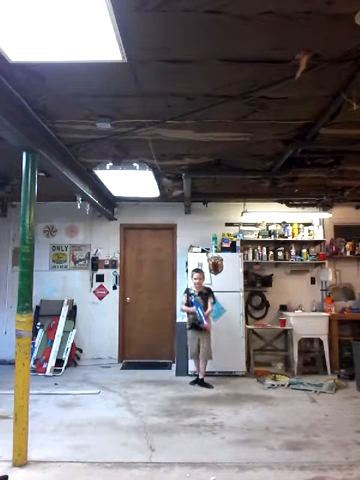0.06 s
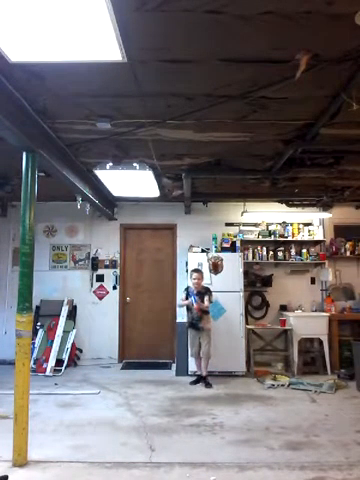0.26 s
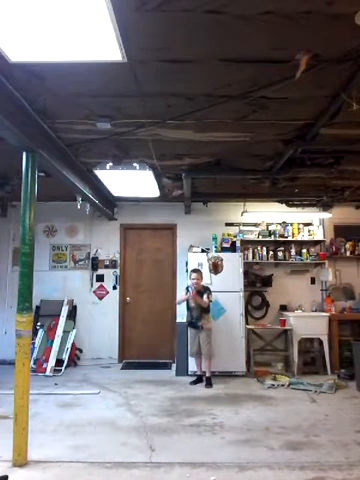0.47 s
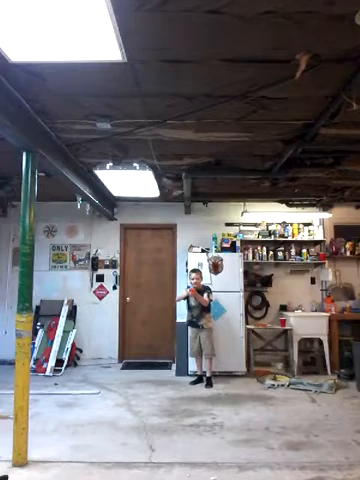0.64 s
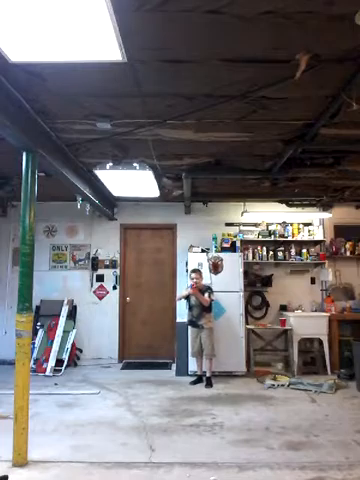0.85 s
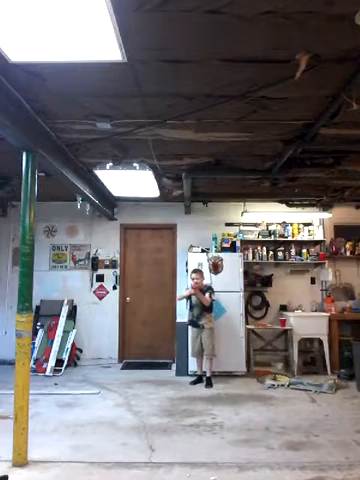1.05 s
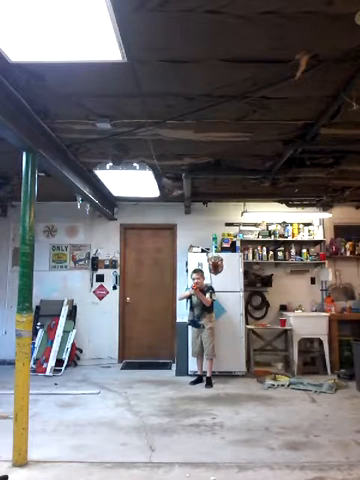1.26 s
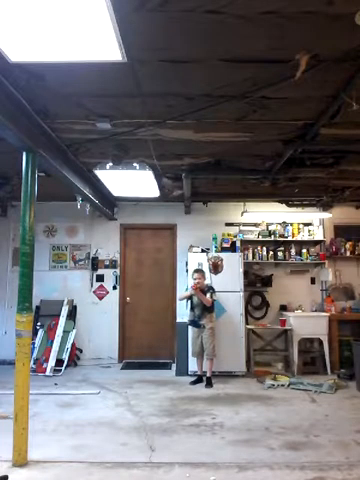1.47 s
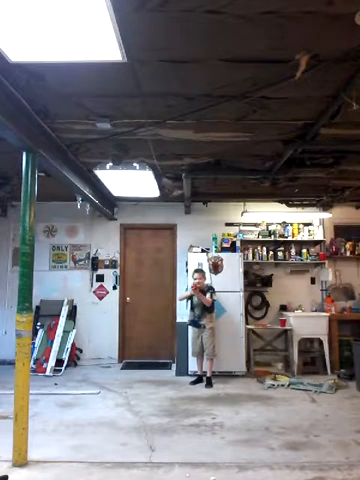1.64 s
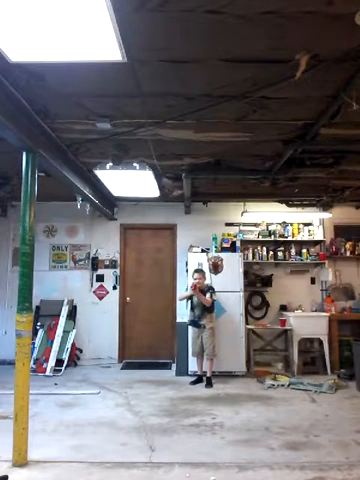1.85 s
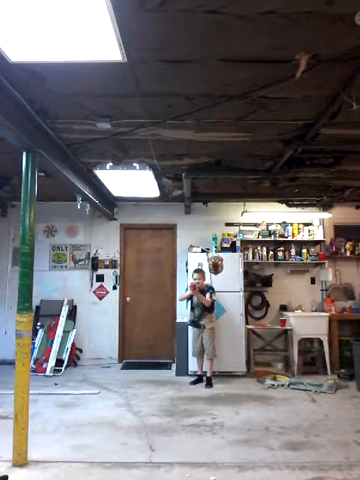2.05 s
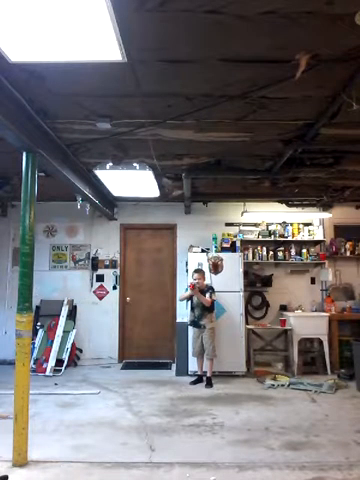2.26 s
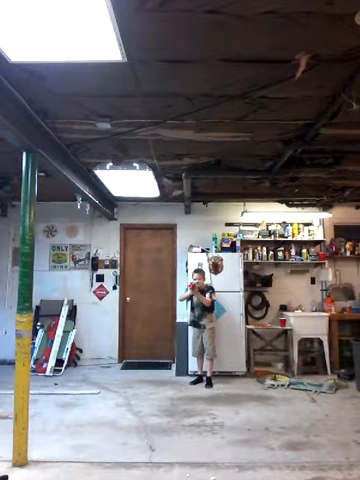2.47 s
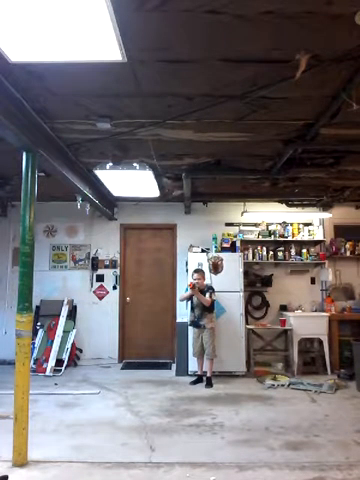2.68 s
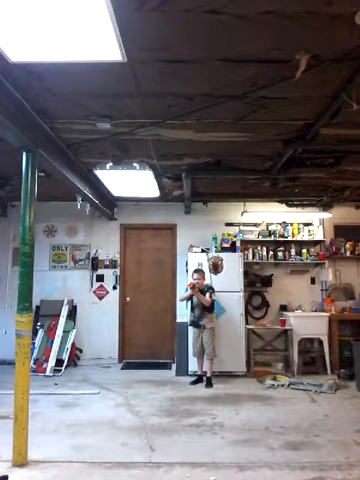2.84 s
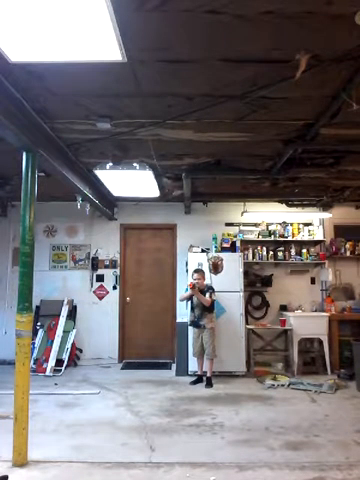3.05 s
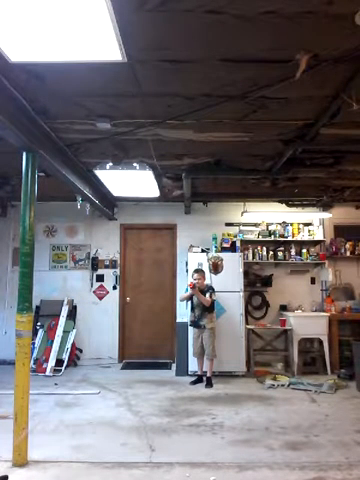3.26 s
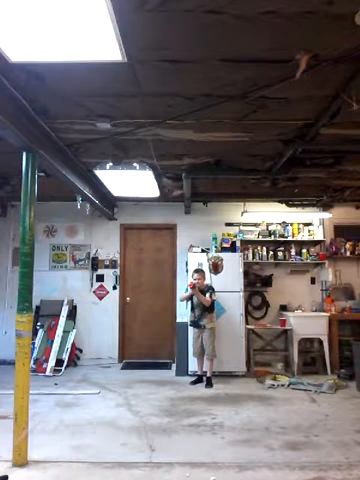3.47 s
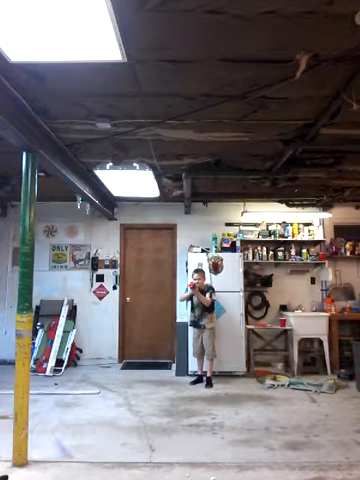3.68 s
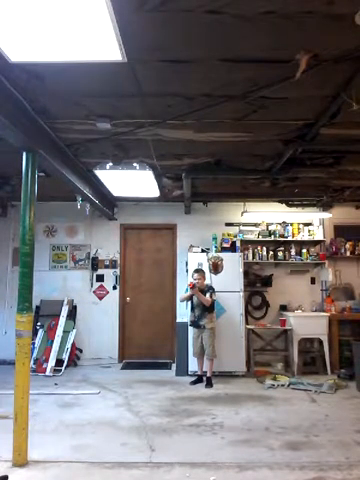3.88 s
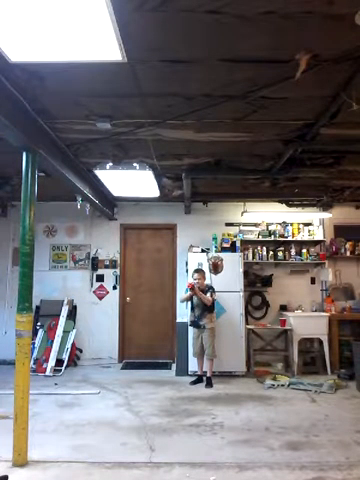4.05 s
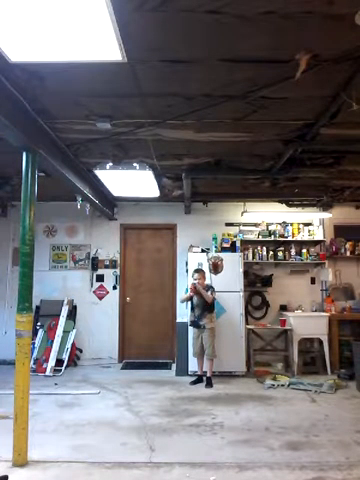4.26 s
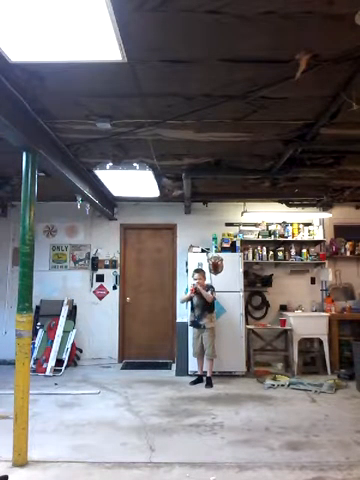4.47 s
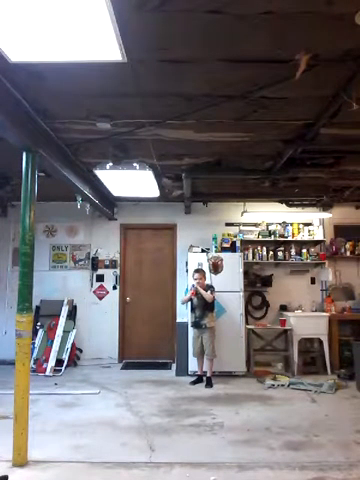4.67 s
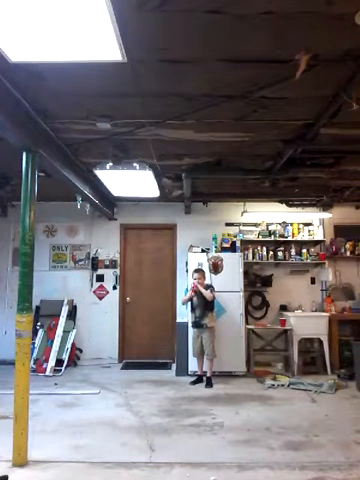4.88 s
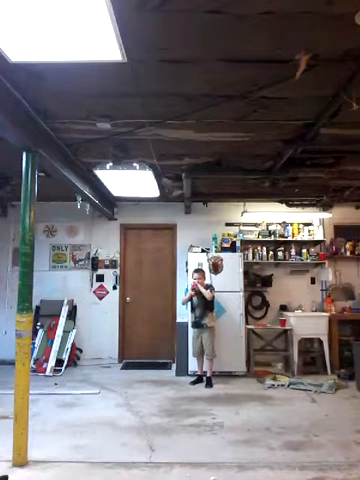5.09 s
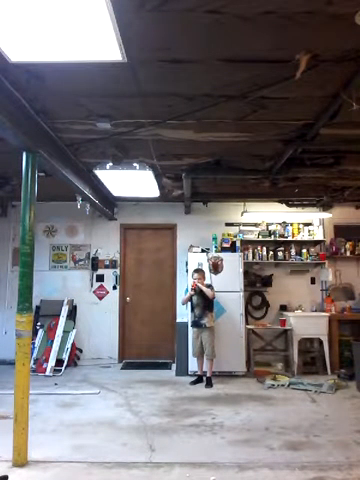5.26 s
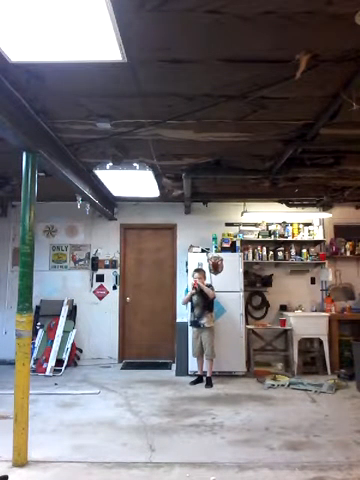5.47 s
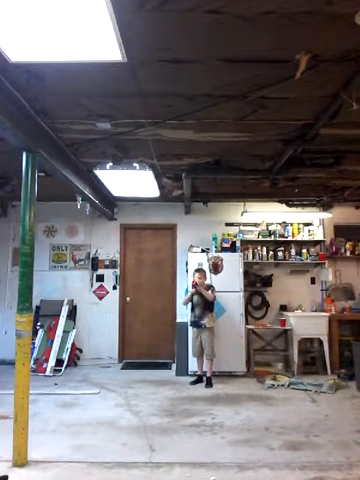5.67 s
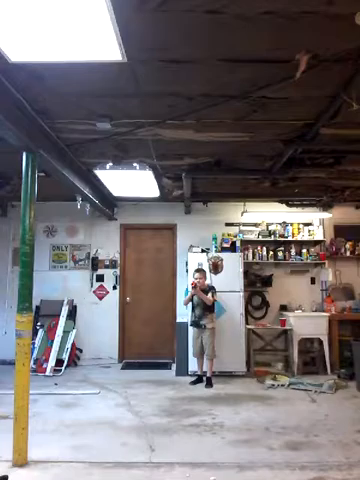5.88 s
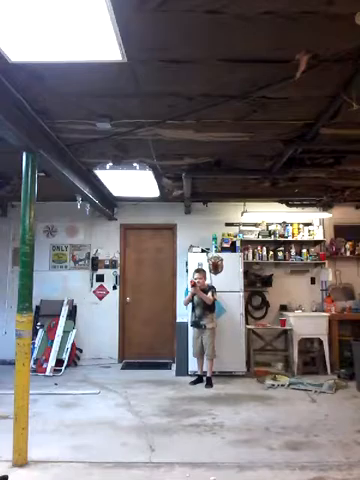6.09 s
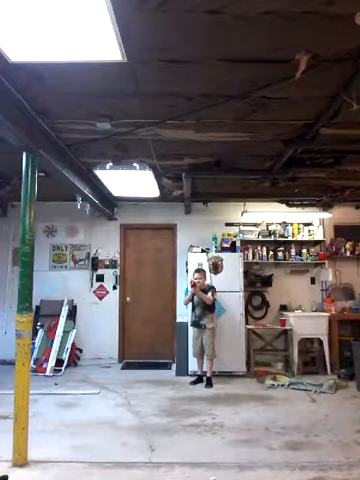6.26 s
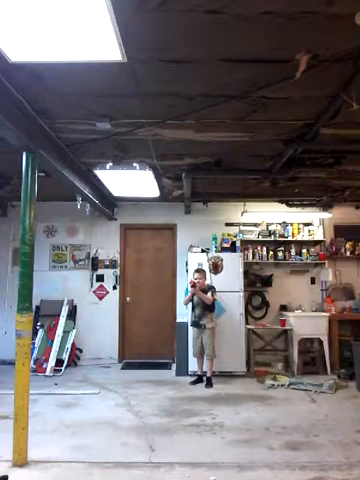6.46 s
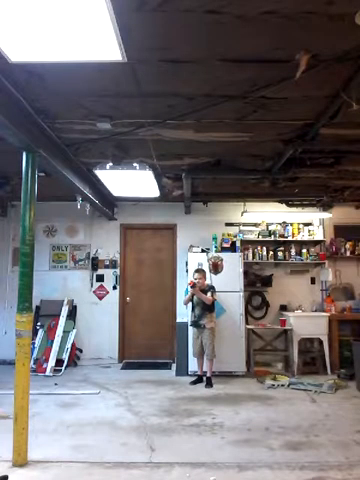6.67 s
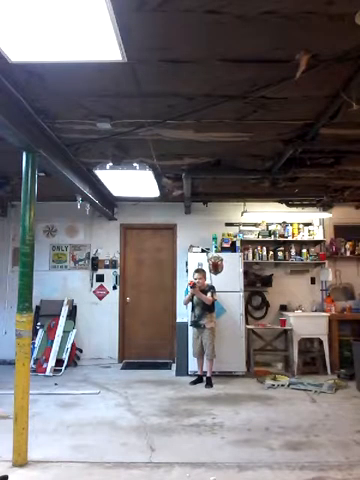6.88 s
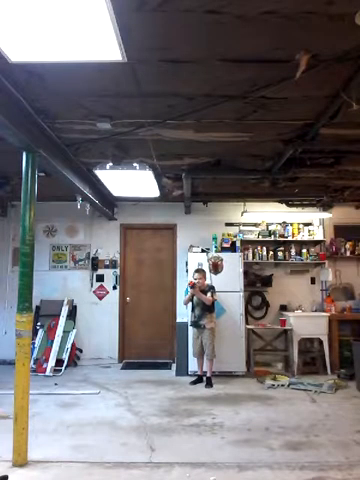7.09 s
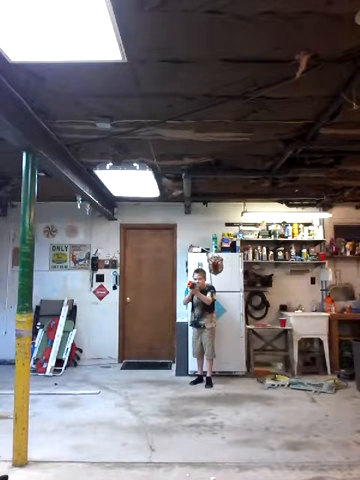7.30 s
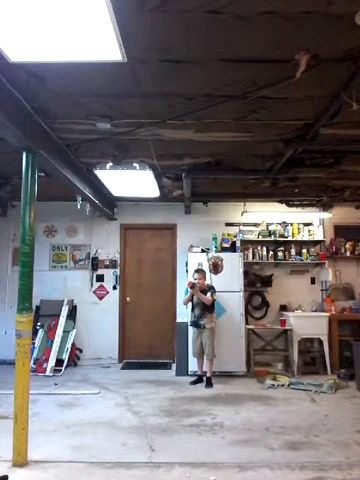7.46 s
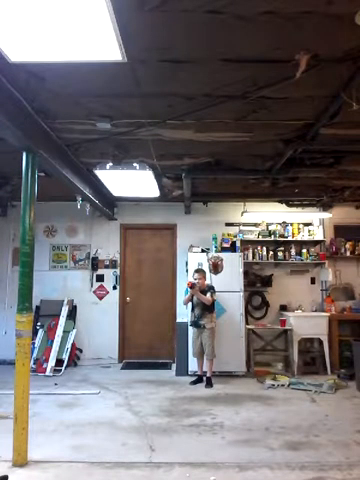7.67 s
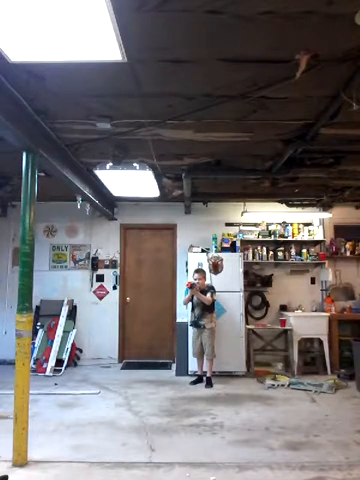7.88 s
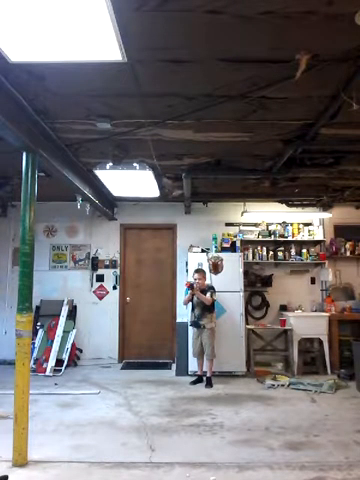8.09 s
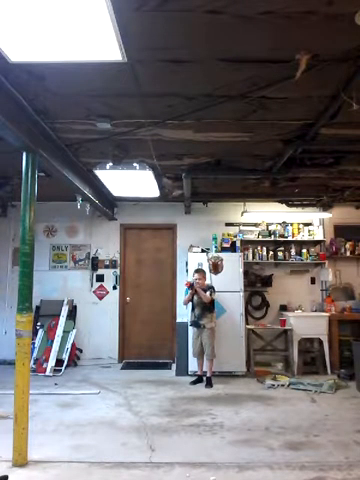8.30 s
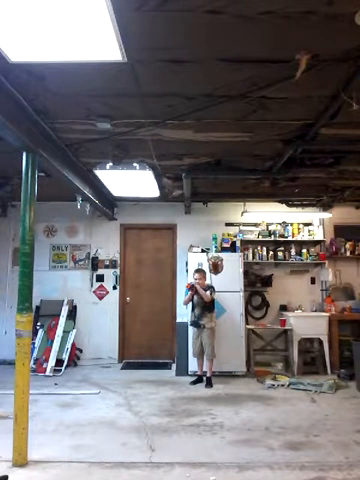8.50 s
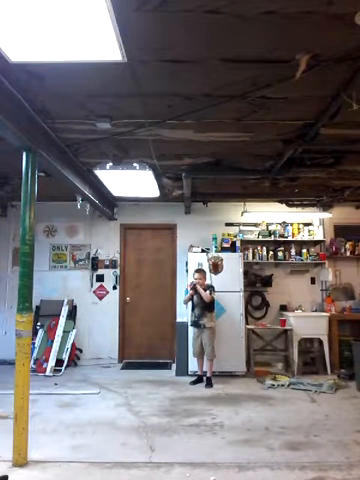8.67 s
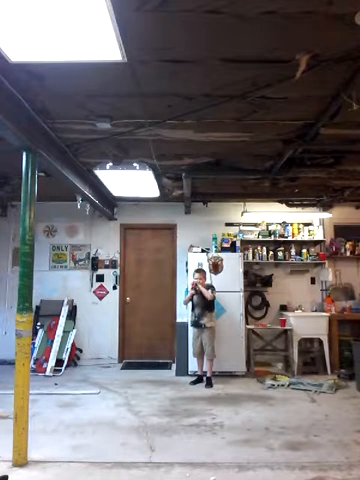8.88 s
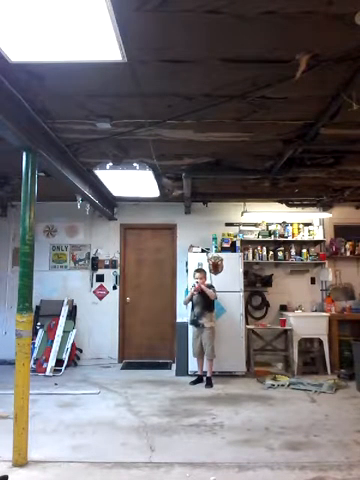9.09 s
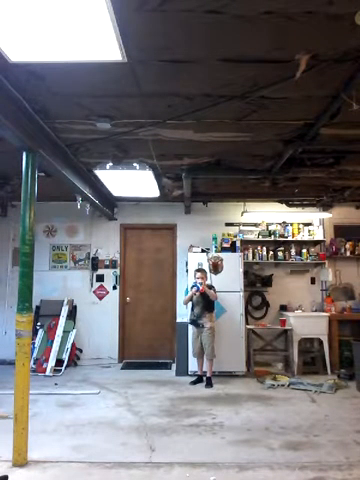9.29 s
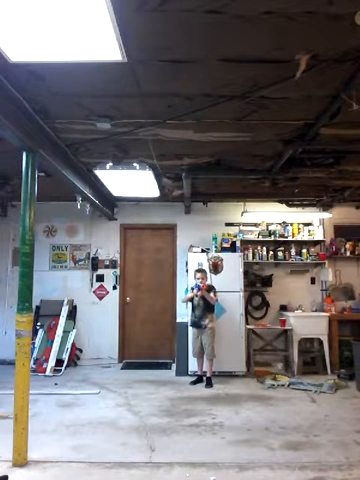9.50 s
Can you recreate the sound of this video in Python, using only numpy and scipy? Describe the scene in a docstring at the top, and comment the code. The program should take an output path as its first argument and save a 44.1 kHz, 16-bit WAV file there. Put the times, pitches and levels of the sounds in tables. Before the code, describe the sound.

A hollow plastic toy blaster is handled at the far end of a reverberant concrete garage. Faint clicks lead to a sharp spring shot, then a loud dart smack right by the microphone and light bounces. The slide is racked back and slammed forward. A second shot follows, its dart booming on a large nearby panel, then more taps, clicks and another racking. Faint hum and hiss lie underneath.

```python
"""Plastic clicks, two sharp shots and spring-loaded slide strokes ring at the far end of a hard-walled garage.
The first dart smacks right beside the microphone, the second booms on a large panel nearby; both drop and bounce.
After each shot the slide is racked back and slammed home. A faint mains hum, hiss and rumble fill the room.
Blows are noise bursts shaped by resonances and a diffuse room tail; rings, panel modes and hum are sines."""
import sys
import numpy as np
from scipy import signal
from scipy.fft import rfft, irfft, next_fast_len
from scipy.io import wavfile
from scipy.ndimage import map_coordinates

SR = 44100
rng = np.random.default_rng(int(sys.argv[2]) if len(sys.argv) > 2 else 0)


def file_out(sig):
    """Save sig as 16-bit WAV at sys.argv[1]."""
    # one column per channel
    cols = np.atleast_2d(sig).T
    # limit, then scale
    lim = np.clip(cols, -1, 1)
    pcm = np.round(lim * 32767).astype(np.int16)
    wavfile.write(sys.argv[1], SR, pcm)


N = 420713  # samples in the scene
SIZE = 40960  # samples in one blow with its tail
T, HZ = np.arange(SIZE) / SR, np.fft.rfftfreq(SIZE, 1 / SR)


def amp(db):
    """Decibels to gain."""
    return 10 ** (np.asarray(db) / 20)


def along(points, hz):
    """Values at hz from (pitch_hz, value) points joined on a log frequency axis."""
    point_hz, value = np.transpose(points)
    return np.interp(np.log(hz + 1), np.log(point_hz + 1), value)


def normed(x):
    """Scaled to an energy of 1."""
    return x / np.sqrt(np.sum(x ** 2) + 1e-20)


def add(track, s, x):
    """Mix x into the track from time s on."""
    start = max(round(s * SR), 0)
    track[start:start + len(x)] += x[:N - start]


def filtered(x, gain):
    """A whole track times a gain of frequency."""
    size = next_fast_len(N + SR // 2)
    spectrum = rfft(x, size) * gain(np.fft.rfftfreq(size, 1 / SR))
    return irfft(spectrum, size)[:N]


def wobble(rate, count):
    """A smooth random curve of count samples, rate knots a second."""
    knots = rng.standard_normal(512)
    return map_coordinates(knots, [np.arange(count) * rate / SR], mode="mirror")


def sine(hz, t, phase=0):
    """A pure tone."""
    return np.sin(2 * np.pi * hz * t + phase)


def resonant(peaks):
    """Gain of (pitch_hz, width_hz, level_db) resonances standing on a flat response."""
    power = sum(amp(2 * db) / (1 + (2 * (HZ - hz) / width) ** 2) for hz, width, db in peaks)
    return np.sqrt(1 + power)


def coloured(x, gain, tilt_db):
    """A blow through a causal (minimum-phase) filter of unit energy; a positive tilt favours the treble."""
    octaves = np.log2(np.clip(HZ, 400, 9000) / 3000)
    gain = gain * amp(tilt_db * octaves)
    unit_gain = gain / np.sqrt(np.mean(gain ** 2))
    # folding the cepstrum onto positive time makes the filter causal
    cepstrum = irfft(np.log(np.maximum(unit_gain, 1e-6)))
    cepstrum[1:SIZE // 2] *= 2
    cepstrum[SIZE // 2 + 1:] = 0
    return irfft(rfft(x) * np.exp(rfft(cepstrum)))


def chatter(length, spiky):
    """A run of tiny contacts of uneven size, dying by 30 dB in length seconds."""
    push, size = rng.standard_normal((2, SIZE))
    uneven = np.tanh(push) * np.exp(spiky * np.minimum(size, 2))
    return uneven * amp(-30 * T / max(length, .002))


# decay of the garage between its hard walls: pitch_hz, t60_s
GARAGE_DECAY = [(80, 0.62), (240, 0.66), (480, 0.28), (1000, 0.37), (2000, 0.4), (4000, 0.5), (6500, 0.46),
                (10000, 0.43), (16000, 0.3)]


def in_garage(x, gain, tilt_db, room_db, build):
    """A blow, its floor echo, and a diffuse tail that builds up and dies by band, all in the blow's colour."""
    hz, t, bands = signal.stft(rng.standard_normal(SIZE), SR, nperseg=256)
    decay = amp(-60 * t / along(GARAGE_DECAY, hz)[:, None])
    tail = signal.istft(bands * decay, SR, nperseg=256)[1][:SIZE]
    # the first reflections arrive unevenly and soon merge
    sparse = np.exp(0.26 * np.exp(-T / .025) * (rng.standard_normal(SIZE) - 1))
    floor_echo = .4 * np.roll(x, round(rng.uniform(.001, .003) * SR))
    direct = normed(x + floor_echo)
    room = normed(tail * sparse * (1 - np.exp(-T / build)))
    return coloured(direct + amp(room_db) * room, gain, tilt_db)


# colour of the hiss as the microphone delivers it: pitch_hz, level_db
HISS_COLOUR = [(30, -31), (100, -3.5), (230, -8), (500, -14), (1000, -18.5), (2400, -21), (4000, -29),
               (6500, -27.5), (9000, -32), (15800, -27.5)]
# slow growth of the rumble, before its layer gain: time_s, level_db
RUMBLE_GROWTH = [(0, -67.5), (9.54, -60)]
# mains hum ahead of its wavering and the microphone: pitch_hz, level_db (rms)
MAINS_HUM = [(59.5, -80.5), (119, -77.5), (241, -75.5)]


def room_tone(air_db=-65, rumble_db=2, waver_db=3.0):
    """Noise makes the faint hiss and slowly growing low rumble; unsteady sines make the mains hum."""
    t = np.arange(N) / SR
    # the microphone port's resonance is taken out here because record() puts it in
    hiss_gain = lambda hz: amp(along(HISS_COLOUR, hz) - along(MIC_PORT, hz))
    air = filtered(rng.standard_normal(N), hiss_gain)
    low_colour = [(30, -12.5), (55, 7.0), (75, -5.5), (105, -3.0), (150, -22.5), (400, -50)]  # pitch_hz, level_db
    low = filtered(rng.standard_normal(N), lambda hz: amp(along(low_colour, hz)))
    rumble_level = np.interp(t, *np.transpose(RUMBLE_GROWTH)) + rumble_db
    rumble = amp(rumble_level) * low / np.std(low)
    hum = np.zeros(N)
    for hz, db in MAINS_HUM:
        hum += amp(db + waver_db * wobble(6.1, N)) * np.sqrt(2) * sine(hz, t)
    return amp(air_db) * air / np.std(air) + rumble + hum


# darts landing and bouncing, levels before the layer gain; ping is relative to the tap:
# start_s, level_db, tilt_db (per octave), room_db (relative to direct sound), knock_hz, ping_db
DART_BOUNCES = [(3.899, -25.5, 0, 5, 1370, -5), (4.058, -26, -2.5, -3.5, 1174, -14),
                (4.216, -36, 1, 3, 1390, -17), (4.453, -37, -1.5, 1, 1400, -10),
                (7.217, -22.5, -3, -3, 2004, -8.5), (7.383, -36, -0.5, -5, 1170, -9),
                (7.408, -34.5, -6.5, 6, 1060, -3), (7.42, -27, 4, -5.5, 687, -9),
                (7.468, -34.5, 3, 2.5, 1070, -12), (7.664, -45, 0.5, 1, 910, -10)]
# colour of a rubber tip on concrete: pitch_hz, level_db
TAP_COLOUR = [(80, -8), (300, -19.5), (750, -2), (1400, -0.5), (2500, -2), (3800, -11.5), (5800, -8),
              (9000, -21.5), (15000, -28)]


def bounces(gain_db=9, ping_t60=0.038):
    """The rubber tips tap on the concrete as the darts tumble, each contact with its own short hollow ping."""
    track = np.zeros(N)
    for s, db, tilt_db, room_db, knock_hz, ping_db in DART_BOUNCES:
        gain = amp(along(TAP_COLOUR, HZ)) * resonant([(knock_hz, 400, 1.5)])
        contact = chatter(length=0.024, spiky=0.36)
        tap = in_garage(contact, gain, tilt_db, room_db, build=0.0033)
        add(track, s, amp(db + gain_db) * tap)
        add(track, s, amp(db + ping_db - 60 * T / ping_t60) * sine(knock_hz, T))
    return track


# colour of the dart's slap on the nearby panel: pitch_hz, level_db
SLAP_COLOUR = [(60, -21.5), (150, -3), (260, -7), (380, 7), (520, 3), (1250, 0), (2000, -5), (3200, -14.5),
               (5300, -13), (7000, -20.5), (8000, -25), (15000, -36.5)]
# low modes of the struck panel, levels before the boom gain: pitch_hz, level_db, t60_s
PANEL_MODES = [(218.4, -39, 2.95), (224, -24.5, 0.45), (352, -1.5, 0.21), (401, -1, 0.2),
               (474, -28.5, 1.05), (630, -15, 0.27), (830, -19, .2), (1160, -24, 0.16)]
# colour of the panel's crowd of weak, lingering modes: pitch_hz, level_db
DRONE_COLOUR = [(90, -22), (190, -2.5), (280, 0), (470, -3), (600, -7.5), (1200, -39.5)]


def panel_hit(s=6.972, slap_db=9, boom_db=-7, lag=.011, swell=0.0032, drone_db=-40, drone_t60=1.86):
    """A dart slaps a large panel, whose low modes boom a moment later and ring on unevenly."""
    track = np.zeros(N)
    contact = chatter(length=0.013, spiky=0.48)
    slap = in_garage(contact, amp(along(SLAP_COLOUR, HZ)), 0, room_db=1.0, build=.005)
    add(track, s, amp(slap_db) * slap)
    t = np.arange(2 * SR) / SR
    mingled = 1 - np.exp(-t / 0.019)  # reflections make each mode wander in level and phase
    for hz, db, t60 in PANEL_MODES:
        level_db = 2.5 * mingled * wobble(35, len(t))
        phase = .6 * mingled * wobble(30, len(t))  # radians
        level = amp(boom_db + db - 60 * t / t60 + level_db) * (1 - np.exp(-t / swell))
        add(track, s + lag, level * sine(hz, t, phase))
    drone = filtered(rng.standard_normal(N), lambda hz: amp(along(DRONE_COLOUR, hz)))[:len(t)]
    add(track, s, amp(drone_db - 60 * t / drone_t60) * mingled * drone / np.std(drone))
    return track


# colour of the dart's smack beside the microphone: pitch_hz, level_db
SMACK_COLOUR = [(50, -13.5), (90, -2), (170, -3), (330, -1.5), (700, -1.5), (2400, -2.5), (3600, -2.5),
                (5300, 1.5), (9000, -3), (11000, -9.5), (15000, -6.5)]
# faint ring of the thing it hits, levels before the ring gain: pitch_hz, level_db, t60_s
STRUCK_RING = [(158, -3.5, .8), (2040, -2.5, .55), (3900, -1, .45), (6500, 0.5, 0.62), (8040, 1.5, .55),
               (11810, -6, .35), (13320, -3.5, .45)]


def near_hit(s=3.3688, db=12, crush=0.0063, echo_db=2, ring_db=-39):
    """The dart's tip crumples against something by the microphone, which rings faintly; the far walls answer late."""
    gain, track = amp(along(SMACK_COLOUR, HZ)), np.zeros(N)
    # noise that stops abruptly after the crush time
    contact = rng.standard_normal(SIZE) * np.exp(-np.minimum(T / crush, 2) ** 6)
    add(track, s, amp(db) * in_garage(contact, gain, 0, room_db=-4.5, build=0.003))
    answer = chatter(length=0.18, spiky=0.18)
    add(track, s + .026, amp(echo_db) * in_garage(answer, gain, 0, room_db=4.0, build=.008))
    for hz, level, t60 in STRUCK_RING:
        add(track, s, amp(ring_db + level - 60 * T / t60) * sine(hz, T))
    return track


# resonances of the hollow plastic shell, levels over the flat response: pitch_hz, width_hz, level_db
SHELL_MODES = [(537.6, 66, 10.5), (620, 33, 3), (697, 34, 2), (1130, 36, -4.5), (1270, 85, 1.5),
               (1421, 20, 4.5), (1860, 48, 1.5), (2030, 120, -3.5), (2400, 120, -2.5), (2636, 200, 1.5)]


def blaster(blows, colour, gain_db, room_db, spiky, build, rise):
    """Plastic parts meet and chatter; each blow stirs the shell's modes differently and has one knock of its own."""
    base, track = amp(along(colour, HZ)), np.zeros(N)
    # each blow: start_s, level_db, tilt_db (per octave), rattle_s, knock_hz, knock_db
    for s, db, tilt_db, length, knock_hz, knock_db in blows:
        modes = [(hz, width, level + rng.normal(0, 3.1)) for hz, width, level in SHELL_MODES]
        knock = (knock_hz, 0.054 * knock_hz, knock_db)
        gain = base * resonant(modes + [knock])
        contacts = chatter(length, spiky) * (1 - np.exp(-T / rise))
        add(track, s, amp(db + gain_db) * in_garage(contacts, gain, tilt_db, room_db, build))
    return track


# distinct clicks of grip, trigger and slide, levels before the layer gain:
# start_s, level_db, tilt_db (per octave), knock_hz, knock_db
HANDLING_CLICKS = [(0.0146, -35, -1, 626, 14.5), (0.144, -38, -1, 2150, 3), (0.254, -41.5, -0.5, 1400, 8),
                   (0.441, -41.5, -3.5, 670, 12), (0.7817, -46, -.5, 1280, 10), (0.986, -40, -3, 1280, 5),
                   (1.131, -43, 0, 2000, 9), (1.1641, -38.5, -1, 2510, 5), (1.3359, -39.5, 0, 2030, 6),
                   (1.6028, -38, 1.5, 2050, 8), (2.2579, -39, -1.5, 564, 17), (3.9935, -35, -0.5, 2010, 3),
                   (4.102, -32, -.5, 1920, 1), (4.293, -33.5, 2.5, 1980, 6), (4.34, -34, 1, 2150, 7),
                   (4.49, -33.5, -.5, 1383, 0), (4.9812, -30, 1.5, 1430, 7.5), (5.05, -31.5, 2.5, 2620, 3),
                   (5.227, -35, 2, 2640, 16), (5.2638, -27, 1.5, 2450, 1), (5.294, -25.5, 0, 2110, -4.5),
                   (5.701, -31.5, -3, 580, 9), (5.7561, -30.5, -.5, 660, 9), (5.843, -25, 0.5, 573, 0),
                   (5.931, -31.5, 1, 2160, 12), (5.968, -30.5, 1, 2660, 6), (6.116, -32.5, 2, 2150, 10),
                   (6.159, -27.5, 3, 2170, 5), (7.885, -40.5, 0, 1900, 17),
                   (7.9184, -25.5, 0.5, 1310, 14.5), (8.1001, -33, -1, 589, 9),
                   (8.2835, -30.5, .5, 1450, 5), (8.3936, -30, 1, 560, 6), (8.4729, -31.5, 1, 1930, -7),
                   (8.927, -29, -.5, 563, 21.5), (8.976, -28.5, 0, 568, 1), (8.9973, -26.5, -1.5, 2100, 8),
                   (9.0895, -30, -.5, 766, 12), (9.484, -33.5, 1.5, 1230, -1)]
# spells of faint ticks from loose parts, levels before the layer gain: start_s, end_s, level_db
LOOSE_TICKS = [(.3, 1.2, -53), (4.37, 4.85, -36), (8.399, 8.9, -37)]


def clicks():
    """The hands shift on the blaster: distinct clicks, and spells of faint, randomly timed ticks."""
    rattle_s, gap_s, tick_knock_db = 0.024, 0.18, 7
    blows = [(s, db, tilt_db, rattle_s, *knock) for s, db, tilt_db, *knock in HANDLING_CLICKS]
    for start, end, db in LOOSE_TICKS:
        for s in np.arange(start, end, gap_s):
            late, mode = rng.random(2)
            knock_hz = SHELL_MODES[int(mode * len(SHELL_MODES))][0]
            blows.append((s + late * gap_s / 2, db, 0, rattle_s, knock_hz, tick_knock_db))
    return blows


# the slide is racked back against the spring, levels before the layer gain:
# scrape_s, catch_s, stop_s, level_db
SLIDE_PULLS = [(4.567, 4.589, 4.645, -8), (8.594, 8.619, 8.6775, -7)]
# the slide is pushed forward, levels before the layer gain: release_s, pick_up_s, slam_s, level_db
SLIDE_PUSHES = [(5.360, 5.372, 5.4458, -5), (9.1114, 9.1643, 9.2299, -3)]
# the breech meets, locks and rebounds, levels relative to the push:
# delay_s, level_db, tilt_db (per octave), rattle_s, knock_hz, knock_db
BREECH_SLAM = [(-.016, -4.5, -1.5, .036, 1500, -1.5), (0, .5, .5, .018, 1965, 3),
               (.0074, -2, -2.5, .026, 620, 5)]


def slide_strokes():
    """Each pull scrapes, catches, snaps over the latch and stops; each push releases, picks up a dart and slams home."""
    # contacts, relative to the stroke: level_db, tilt_db (per octave), rattle_s, knock_hz, knock_db
    slack, scrape = (-19.5, -3.5, 0.1, 760, -1), (-11.5, -1, 0.2, 1260, 8)
    catch, latch = (0, -.5, 0.11, 1350, 0), (0, .5, 0.06, 4899, 4)
    end_stop = (1.1, .5, 0.03, 535, 11)
    release, pick_up = (-8.5, -1, 0.5, 729, 10), (-9, -4.5, 0.38, 552, 5)
    slack_lead_s, latch_share = .0135, .65  # the latch's share of the way from catch to stop
    blows = []
    for scrape_s, catch_s, stop_s, db in SLIDE_PULLS:
        latch_s = catch_s + latch_share * (stop_s - catch_s)
        contacts = [(scrape_s - slack_lead_s, *slack), (scrape_s, *scrape), (catch_s, *catch),
                    (latch_s, *latch), (stop_s, *end_stop)]
        blows += [(s, db + level, *tone) for s, level, *tone in contacts]
    for release_s, pick_up_s, slam_s, db in SLIDE_PUSHES:
        contacts = [(release_s, *release), (pick_up_s, *pick_up)]
        contacts += [(slam_s + delay, *rest) for delay, *rest in BREECH_SLAM]
        blows += [(s, db + level, *tone) for s, level, *tone in contacts]
    return blows


# the plunger strikes home, level before the layer gain; sear and rebound are relative to the strike:
# start_s, level_db, tilt_db (per octave), knock_hz, sear_db, rebound_db
PLUNGER_SHOTS = [(3.112, -5.5, -.5, 625, -16.5, -1.5), (6.693, -3, 0.5, 1344, -10, -16)]


def plunger_strokes():
    """The sear lets go, the plunger strikes home and rebounds once."""
    # tilt_db (per octave), rattle_s, knock_hz, knock_db
    sear, rebound = (2, .035, 1070, 23), (1, .021, 1240, 14)
    sear_lead_s, rebound_s, rattle_s, strike_knock_db = .007, .011, .058, 10
    blows = []
    for s, db, tilt_db, knock_hz, sear_db, rebound_db in PLUNGER_SHOTS:
        blows.append((s - sear_lead_s, db + sear_db, *sear))
        blows.append((s, db, tilt_db, rattle_s, knock_hz, strike_knock_db))
        blows.append((s + rebound_s, db + rebound_db, *rebound))
    return blows


# colours of handling clicks, slide strokes and shots: pitch_hz, level_db
CLICK_COLOUR = [(100, -26.5), (330, -12), (520, -5.5), (720, -0.5), (900, -1), (2000, 0.5), (3400, -5.5),
                (5200, -3), (7000, -4), (10000, -14), (15500, -16)]
CLACK_COLOUR = [(60, -29), (170, -29.5), (310, -13.5), (450, -9), (900, -0.5), (2000, 1), (3400, -6),
                (5200, -2), (8000, -5.5), (10000, -16), (12000, -12), (15500, -18.5)]
POP_COLOUR = [(50, -21), (110, -9), (210, -6.5), (400, -0.5), (900, -1), (2000, 2), (3400, -8.5),
              (5200, -4), (8000, -10), (10000, -18), (15500, -19.5)]


def scene():
    """Room tone, darts and blaster in one channel."""
    background = room_tone()
    darts = bounces() + panel_hit() + near_hit()
    handling = blaster(clicks(), CLICK_COLOUR, gain_db=12, room_db=4, spiky=.85, build=0.0066, rise=0.0023)
    priming = blaster(slide_strokes(), CLACK_COLOUR, gain_db=10.5, room_db=3.5, spiky=1.05,
                      build=0.0044, rise=0.0028)
    shots = blaster(plunger_strokes(), POP_COLOUR, gain_db=16, room_db=0, spiky=0.45,
                    build=0.0099, rise=0.0011)
    return (background + darts + handling + priming + shots)[None]


# resonance of the microphone port: pitch_hz, level_db
MIC_PORT = [(5400, 0.5), (6250, 8.5), (6800, 8.5), (7400, -1.5), (8500, -2.5), (13500, -4), (15800, -5)]


def record(dry):
    """The microphone drops the deepest bass and its port rings in the treble; nothing passes above the band limit."""
    low_hz, top_hz = 45, 15850
    low_cut = lambda hz: 1 - 1 / (1 + (hz / low_hz) ** 6)
    high_cut = lambda hz: np.clip((top_hz - hz) / 300 + .5, 0, 1)  # a 300 Hz wide slope
    return filtered(dry[0], lambda hz: low_cut(hz) * amp(along(MIC_PORT, hz)) * high_cut(hz))[None]


dry = scene()
out = record(dry)
file_out(out)
```